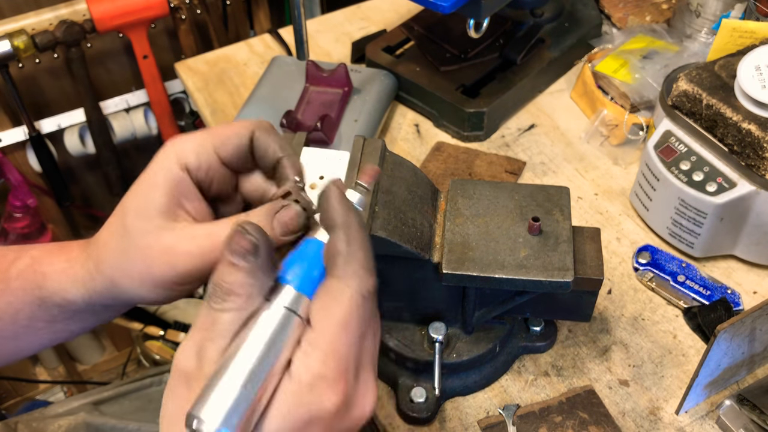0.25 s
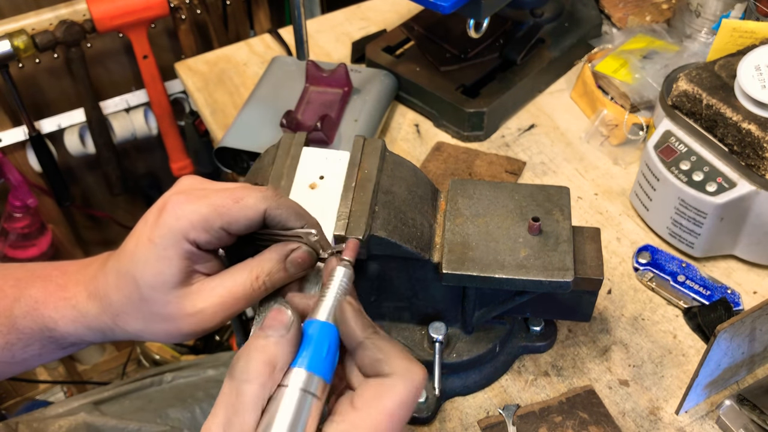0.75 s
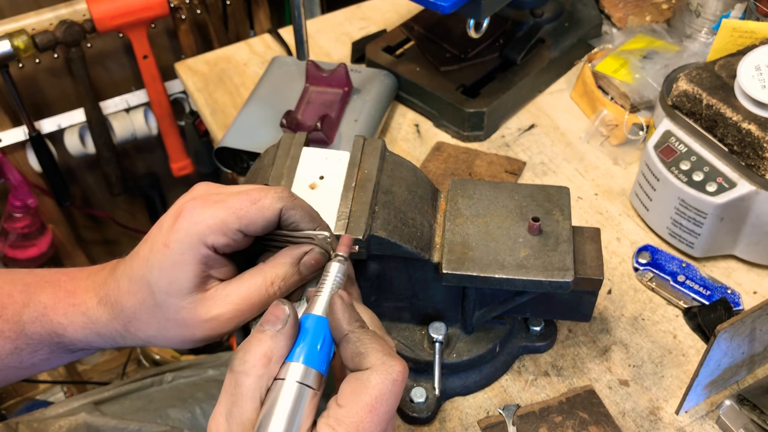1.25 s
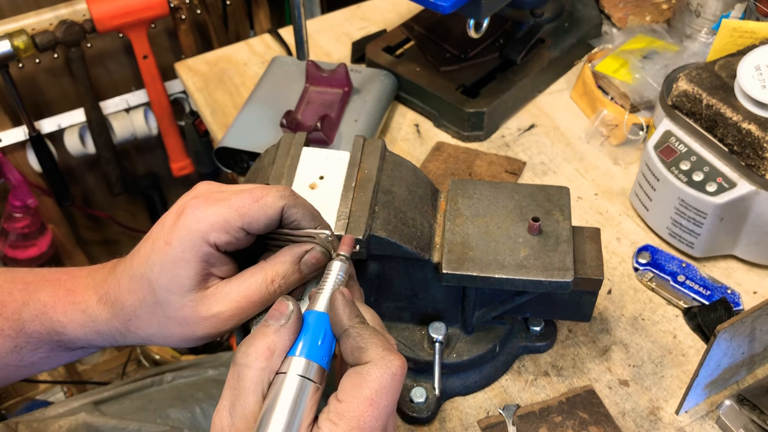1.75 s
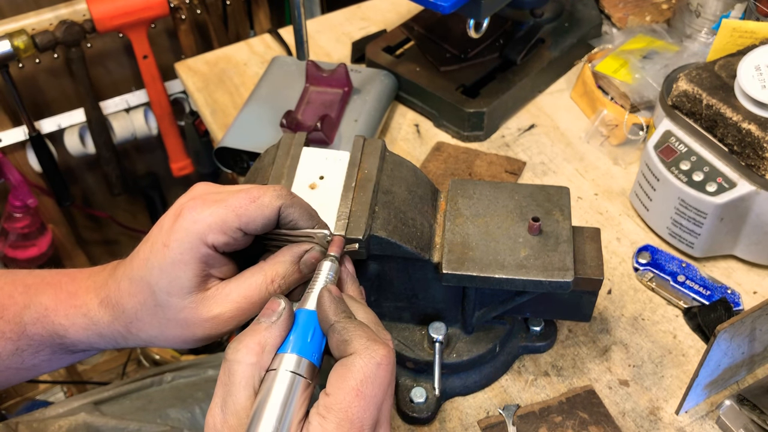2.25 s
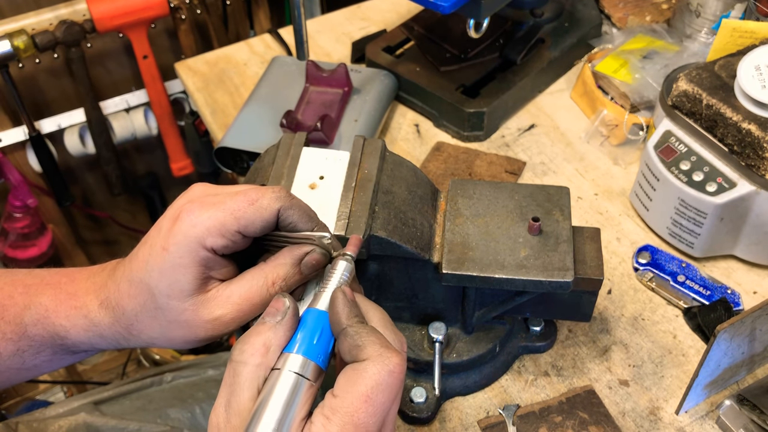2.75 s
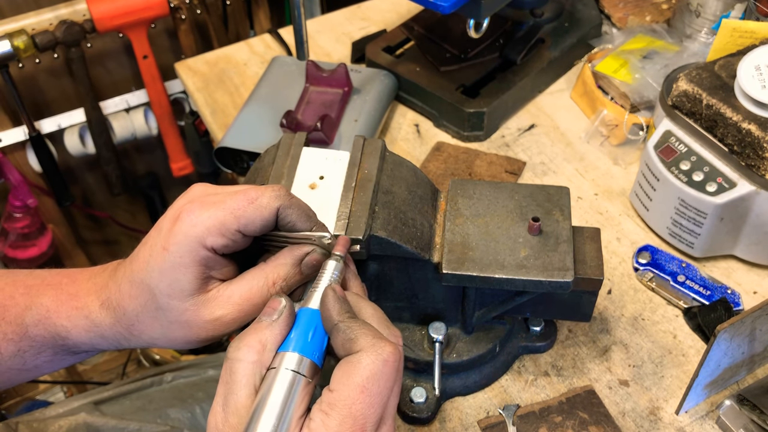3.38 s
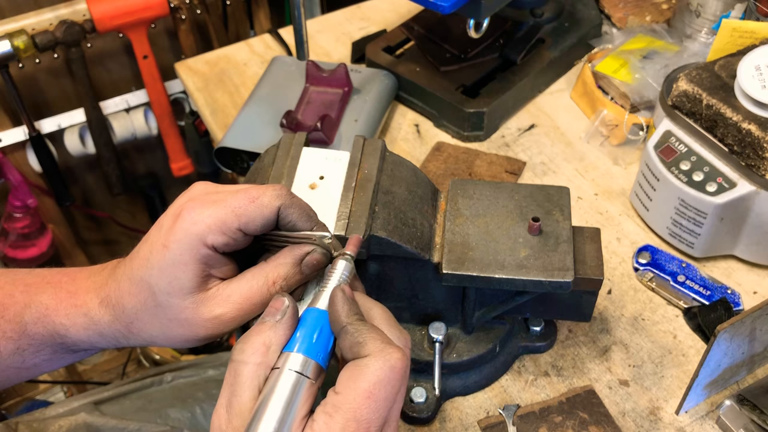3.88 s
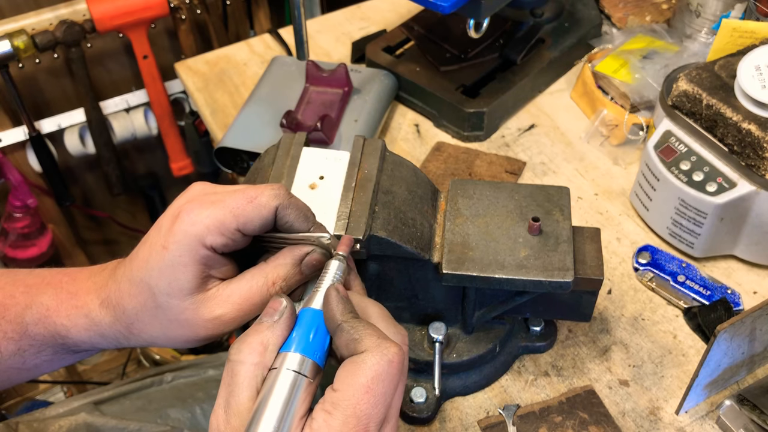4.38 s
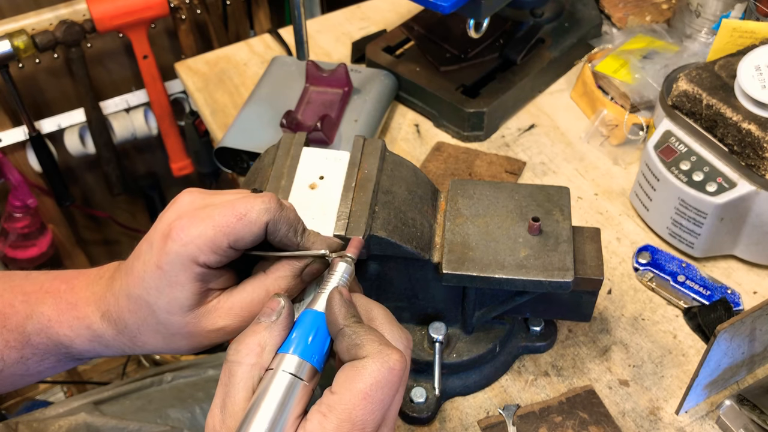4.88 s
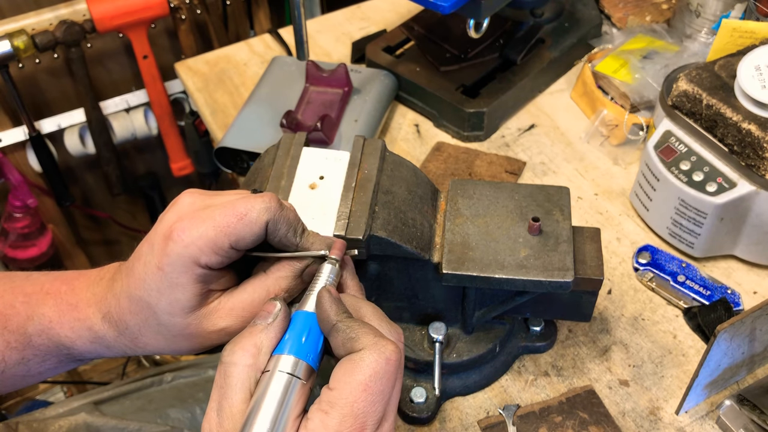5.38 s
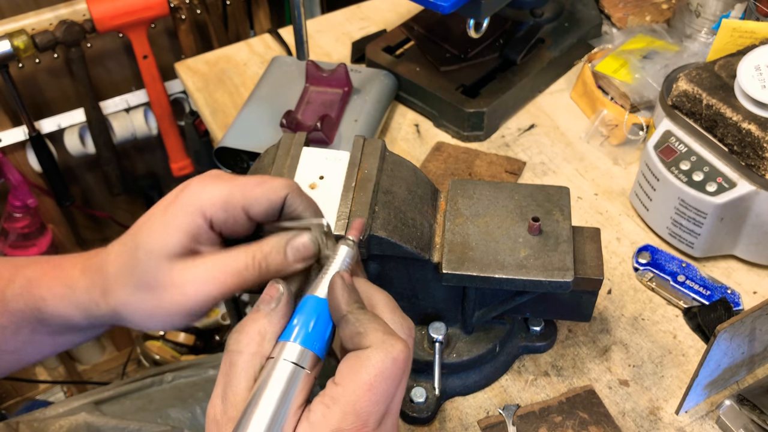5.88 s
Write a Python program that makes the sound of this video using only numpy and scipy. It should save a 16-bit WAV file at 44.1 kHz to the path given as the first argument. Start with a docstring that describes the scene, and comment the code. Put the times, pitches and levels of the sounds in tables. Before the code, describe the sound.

A handheld rotary tool runs close to the microphone at a workbench, with a buzzing whine, airy hiss and a thin high whistle. After about a second its abrasive bit touches a small metal piece and starts rasping in short, uneven passes. Firmer presses drag the pitch down and bring rapid rattling, brief chatter and tiny bright screeches. The motor recovers between passes and spins freely at the end.

```python
"""Rotary tool sanding metal

A handheld rotary tool sands a small metal piece held against a vise, heard close up.
Pressed on, the bit slows, knocks the work once a turn and rasps; now and then it bites or chatters.
Underneath, the shaft hums and buzzes, the motor moves air, the bearings hiss
and the speed controller whistles at a fixed pitch."""
import sys
import numpy as np
from scipy import signal
from scipy.fft import rfft, irfft, next_fast_len
from scipy.io import wavfile
from scipy.ndimage import uniform_filter1d, map_coordinates

SR = 44100
rng = np.random.default_rng(int(sys.argv[2]) if len(sys.argv) > 2 else 0)


def store_wav(level_fs):
    """Save 16-bit WAV to argv[1]."""
    pcm = np.round(np.clip(np.atleast_2d(level_fs), -1, 1) * 32767)
    wavfile.write(sys.argv[1], SR, pcm.T.astype(np.int16))


N = 270319
IDLE_HZ, FIRM_DRAG_HZ = 236.9, 30  # free-running turns a second; what a firm press takes off them
WIDE_WHIRL_DB, TOP_HZ = -47, 15760


# The bit rests lightly on the work. Each row: start and end in seconds.
TOUCH_SPANS = [(1.601, 2.63), (2.68, 3.76), (3.86, 4.59), (4.96, 5.67)]
# The hand leans in; drag is the speed the load would cost if held. Each row: start and end in seconds,
# first and last drag in Hz, relative levels of knock, rasp and scrape in dB.
HAND_PRESSES = [(1.2, 1.242, 9, 10, -50, -48, -39.5), (1.64, 1.757, 8.3, 9.6, -43.5, -38, -38.5),
                (1.751, 1.847, 12, 13.3, -47, -41, -38.5), (1.984, 2.109, 16.1, 25.3, -35.5, -39, -38),
                (2.164, 2.32, 21, 36, -35.5, -36, -40), (2.326, 2.467, 32.4, 59, -36.5, -35.5, -37.5),
                (2.465, 2.585, 60, 68, -39.5, -36.5, -39), (2.777, 2.914, 14.4, 17.2, -47.5, -39.5, -42.5),
                (3.002, 3.137, 21.2, 19, -37, -39, -45), (3.152, 3.233, 10.5, 10.3, -43, -40, -48),
                (3.246, 3.276, 12, 14.6, -35, -35.5, -39), (3.277, 3.335, 85, 100, -35, -36.5, -42),
                (3.343, 3.412, 45, 47, -35, -38.5, -40.5), (3.425, 3.481, 54, 57, -34, -38, -37),
                (3.485, 3.581, 51, 50, -36.5, -39.5, -39.5), (3.582, 3.642, 50, 48.5, -41, -41.5, -38.5),
                (3.937, 4.018, 11, 18.7, -47, -42, -43), (4.096, 4.152, 26, 26, -35, -47, -41.5),
                (4.151, 4.37, 26, 25.3, -35.5, -37.5, -41.5), (4.368, 4.458, 58, 44.4, -36, -38.5, -39.5),
                (4.466, 4.571, 40, 22.4, -39.5, -38, -40), (4.998, 5.097, 10, 13.1, -43, -37, -38),
                (5.147, 5.247, 5.45, 9.1, -45, -40.5, -39), (5.25, 5.379, 11.3, 25.6, -43, -39, -40),
                (5.385, 5.517, 111, 62, -37.5, -35, -36.5), (5.521, 5.591, 52, 58, -40.5, -40, -38.5),
                (5.597, 5.699, 83.5, 82, -40, -38, -38.5)]

def hand():
    """Touches and presses set the drag on the bit in Hz and the gains of knock, rasp and scrape."""
    touch_drag_hz, sag_db_per_s, release_s = 7.1, 3, .036
    touch = sum(gate(*span) for span in TOUCH_SPANS)
    drag = touch_drag_hz * touch
    gains = amp([[-47.5], [-42], [-43.5]]) * touch  # knock, rasp, scrape
    powers = np.array([[.37], [.14], [.12]])  # how each grows with effort
    for start, end, first_hz, last_hz, *levels_db in HAND_PRESSES:
        on = gate(start, end)
        push = curve([(start, first_hz), (end, last_hz)])
        drag += on * push
        held = on > 0
        effort = (push[held] + touch_drag_hz) / (push[held].mean() + touch_drag_hz)
        pressed = amp(levels_db)[:, None] * effort ** powers
        # the knock softens as the bit beds in and dies away as the hand eases off
        left_s = np.arange(held.sum(), 0, -1) / SR
        pressed[0] *= amp(sag_db_per_s * (left_s - left_s.mean())) * np.sqrt(np.tanh(left_s / release_s))
        gains[:, held] += on[held] * (pressed - gains[:, held])
    return drag, *gains


def rotor(drag, inertia_s=.117):
    """Turns a second: the rotor sags under drag and recovers with the same lag."""
    keep = np.exp(-1 / (inertia_s * SR))
    return IDLE_HZ - signal.lfilter([1 - keep], [1, -keep], drag)


# The bright rasp and the darker scrape. Each row: frequency in Hz, relative level in dB.
RASP_SPECTRUM = [(500, -46), (2000, -9), (5200, -7), (6600, 1), (8300, 6.5), (9400, 4), (10800, 2.5),
                 (12200, 1.5), (13800, 4.5), (14800, 9), (15600, 10)]
SCRAPE_SPECTRUM = [(200, -32), (700, -15.5), (1300, -7), (1900, -1.5), (2600, 0), (3300, -5.5), (3900, -10),
                   (4500, -1), (5300, -4), (6500, 0), (8500, -47), (12000, -45)]

def sanding(turns, rasp_gain, scrape_gain):
    """Grit tears the metal in tiny clumps, most at the high spot; the same grains return each turn."""
    clumps = unit(amp(2 * wobble(1100) + 1.2 * wobble(60)))
    tearing = clumps * per_turn(turns, depth_db=8, scatter_db=1.5) * patchy(3.5)
    rasp = coloured(tearing, RASP_SPECTRUM)
    rub = coloured(per_turn(turns, depth_db=7, scatter_db=7.5) * patchy(2.6), SCRAPE_SPECTRUM)
    scrape = unit(rub + amp(-1.5) * ragged_wave(turns, SCRAPE_SPECTRUM))
    return amp(4 + .4 * wobble(21.4)) * rasp_gain * rasp + amp(wobble(24.98)) * scrape_gain * scrape


def blows(turns, slowing, scuff_db):
    """The high spot of the bit strikes and scuffs once a turn, more unevenly towards a stall."""
    at = passes(turns)
    jitter, strength = rng.standard_normal((4096, 2))[:len(at)].T
    at = np.clip(np.round(at + 1e-5 * SR * jitter), 0, N - 1).astype(int)
    scatter_db = .5 + 6 * slowing[at]
    strikes = np.bincount(at, amp(scatter_db * strength), N)
    scuff = per_turn(turns, depth_db=15, scatter_db=4) * rng.standard_normal(N)
    return unit(strikes) + amp(scuff_db) * scuff


# The ring of the held piece. Each row: frequency in Hz, width in Hz, relative level in dB.
PIECE_MODES = [(1506.3, 106.6, 2), (1707.4, 130, 0), (1983, 188.5, 0.5), (2289.5, 200, -1.5),
               (2610, 350, -9)]
# How well the piece radiates. Each row: frequency in Hz, relative gain in dB.
PIECE_RADIATION = [(300, -36), (650, -15), (900, 2), (1100, -5), (1280, -1.5), (2700, 3), (3400, -3),
                   (6000, -7)]

def knocking(turns, knock_gain, slowing):
    """The blows ring the held piece, whose modes die away within a turn or two."""
    force = blows(turns, slowing, scuff_db=-17)
    ring = sum(amp(db + 2.3 * wobble(45)) * resonate(force, [(hz, width, 0)])
               for hz, width, db in PIECE_MODES)
    return amp(-2 + .13 * wobble(30)) * knock_gain * coloured(ring, PIECE_RADIATION)


# Brief rattles. Each row: centre in seconds, level in dB, half length in seconds, pitch in Hz.
PIECE_RATTLES = [(1.133, -45, 0.05, 4500), (1.272, -44, 0.03, 4730), (1.486, -50, 0.14, 4700),
                 (2.001, -42, 0.0099, 1630), (2.09, -43, 0.011, 1500), (2.235, -43, .045, 2150),
                 (2.34, -38, .014, 1530), (2.412, -39, 0.014, 1580), (2.408, -44, 0.011, 2350),
                 (2.45, -39.5, 0.033, 4600), (2.702, -44, 0.11, 4550), (3.305, -41, 0.021, 1399),
                 (3.468, -43, 0.018, 3350), (3.52, -44, 0.048, 2406), (3.633, -35.5, 0.012, 4874),
                 (4.13, -48, .025, 2432), (4.436, -41, 0.015, 1455), (5.396, -37.5, .012, 1379),
                 (5.501, -33.5, 0.012, 1556), (5.547, -45, 0.0081, 1501), (5.573, -46, .009, 2381),
                 (5.634, -39.5, .055, 4320), (5.65, -43, 0.016, 1400)]

def rattles(turns, slowing):
    """The piece rattles against the bit: looser, rougher blows bring out one resonance."""
    contacts = blows(turns + .15, slowing, scuff_db=-9) + slowing * rng.standard_normal(N)
    out = np.zeros(N)
    for centre, db, half, hz in PIECE_RATTLES:
        ring = signal.lfilter(*signal.iirpeak(hz, Q=7, fs=SR), contacts)
        out += swell(centre, db, half) * unit(ring)
    return out


# The grit digs in at an edge. Each row: centre in seconds, level in dB, half length in seconds.
EDGE_BITES = [(1.152, -34, 0.01), (1.221, -29.5, 0.019), (2.58, -33, 0.019), (2.83, -34, 0.02),
              (3.643, -30, 0.025), (3.714, -34.5, 0.019), (3.888, -36, 0.016), (4.574, -39, 0.013),
              (4.986, -35.5, 0.038), (5.684, -31, 0.028)]
# The high modes of the piece. Each row: frequency in Hz, width in Hz, relative gain in dB.
SCREECH_MODES = [(10400, 500, -0.5), (12050, 640, 0), (15500, 1100, 7.5)]
# The edge sticks. Each row: centre in seconds, level in dB, half length in seconds, pitch in Hz.
EDGE_SQUEAKS = [(2.86, -41, .033, 10930), (2.835, -45, .025, 11820), (3.9, -47, .025, 10900)]

def bites(turns, bite_gain):
    """Short bright screeches where an edge catches the grit, some with a narrow squeak."""
    t = np.arange(N) / SR
    friction = per_turn(turns, depth_db=9, scatter_db=2) * rng.standard_normal(N)
    slip = unit(wobble(400))
    squeaks = sum(swell(centre, db, half) * np.sin(2 * np.pi * hz * t)
                  for centre, db, half, hz in EDGE_SQUEAKS)
    return bite_gain * resonate(friction, SCREECH_MODES) + np.sqrt(2) * slip * squeaks


# The bit bounces on the work. Each row: start and end in seconds, relative level in dB.
CHATTER_BURSTS = [(3.287, 3.339, -28.5), (3.434, 3.46, -33.5), (5.383, 5.411, -29)]
# The colour of a crack. Each row: frequency in Hz, relative gain in dB.
CRACK_SPECTRUM = [(300, -32), (900, -13), (1400, 5), (2400, 0.5), (3600, 2.5), (5200, 0), (7000, 6.5),
                  (9500, -2.5), (15000, -5)]

def chatter(turns, t60=.02):
    """Hard dry cracks of uneven strength, one a turn, damped at once by the fingers."""
    t = np.arange(1024) / SR
    at = passes(turns)
    cracks = np.zeros(N)
    for start, end, db in CHATTER_BURSTS:
        for i in at[(at > start * SR) & (at < end * SR)]:
            decay = amp(db + 2 * rng.uniform(-1, 1) - 60 * t / t60)
            cracks[int(i):][:len(t)] += decay * rng.standard_normal(len(t))
    return filtered(cracks, lambda hz: amp(along(CRACK_SPECTRUM, hz) + 3.5))


# Side load bends the shaft twice a turn and it resonates.
# Each row: frequency in Hz, relative level under a firm press in dB.
FLEX_RESONANCE = [(320, -69), (355, -63.5), (385, -71), (412, -63), (440, -57), (470, -76)]
# The ride of the shaft's third order. Each row: time in seconds, relative level in dB.
THIRD_ORDER_RIDE = [(0.0, -52), (1.07, -58.5), (1.28, -51), (1.31, -57), (1.8, -56.5), (2.06, -53),
                    (2.12, -64), (2.18, -54.5), (2.34, -52), (2.37, -66), (2.42, -58), (2.62, -59.5),
                    (2.78, -52.5), (2.82, -61), (3.06, -59), (3.13, -64), (3.25, -55.5), (3.33, -61),
                    (3.7, -60), (3.84, -48.5), (4.01, -56.5), (4.06, -50), (4.11, -73), (4.2, -54.5),
                    (4.58, -57), (4.7, -48.5), (4.98, -47), (5.04, -54), (5.22, -53), (5.27, -62),
                    (5.43, -58), (5.7, -61.5), (5.91, -48), (6.13, -47.5)]
# Overtones of the free-running bit. Each row: multiple of the turn rate, level in dB.
IDLE_ORDERS = [(4, -56.5), (6, -56), (7, -54.5), (8, -61), (10, -58), (13, -60)]

def shaft_hum(turns, slowing, load):
    """The shaft's clean low orders, which waver under load and judder towards a stall."""
    def order(k):
        return np.sqrt(2) * np.sin(2 * np.pi * (k * turns + rng.random()))

    def judder():
        return amp(load * (2.5 * wobble(35) - .5) + 9 * slowing * wobble(90) - 3 * slowing)

    unbalance = amp(-59.8 - 39 * slowing + .77 * wobble(4.47)) * order(1)
    flex_gain = amp(-75.5) + load * amp(along(FLEX_RESONANCE, 2 * IDLE_HZ * (1 - slowing)))
    flex = judder() * flex_gain * order(2)
    third = judder() * amp(curve(THIRD_ORDER_RIDE) + 1.5) * order(3)
    running_free = np.clip(1 - slowing / .035, 0, 1)
    overtones = sum(amp(db + 2.2 * wobble(2.3)) * order(k) for k, db in IDLE_ORDERS)
    return unbalance + flex + third + running_free * overtones


# The shaft whirls more as the grip shifts. Each row: time in seconds, relative unloaded whirl in dB.
WHIRL_RIDE = [(0, -63), (1.3, -52), (2.2, -53.5), (3.3, -46), (4.7, -45.5), (6.13, -46)]
# The colour of the buzz. Each row: frequency in Hz, relative level in dB.
BUZZ_SPECTRUM = [(900, -34), (1150, 0), (1400, 2), (1650, 2), (1880, 1.5), (2300, 1), (2560, 5.5),
                 (2780, 8.5), (3000, 0), (3280, -1), (3500, -5), (4050, 1.5), (4400, -2), (4650, 8),
                 (4900, -4), (6300, -8), (8000, 3), (10400, -9), (12000, -36)]

def shaft_buzz(turns, whirl_db):
    """The whirling shaft rattles in its play: a buzz that falls away fast as the whirl narrows."""
    level_db = whirl_db + 7 - 1.7 * np.maximum(WIDE_WHIRL_DB - whirl_db, 0)
    pulses = per_turn(turns, depth_db=10, scatter_db=-2) * rng.standard_normal(N)
    high_orders = ragged_wave(turns + .003 * wobble(70), BUZZ_SPECTRUM)
    buzz = unit(high_orders + amp(-13) * coloured(pulses, BUZZ_SPECTRUM))
    return amp(level_db + .55 * wobble(25)) * buzz


# The ride of the motor's air. Each row: time in seconds, level at full speed in dB.
AIR_RIDE = [(0, -37.5), (.5, -39), (.9, -39), (2, -39.5), (4.6, -40), (6.13, -40)]
# The colour of the air. Each row: frequency in Hz, relative level in dB.
AIR_SPECTRUM = [(25, -35), (60, -16), (200, -16), (400, -16), (750, -7), (1080, -5.5), (1240, 3),
                (1550, -0.5), (2500, -0.5), (3350, -4.5), (4000, 0), (4600, 0), (5150, -8.5), (6300, -5),
                (9000, -7), (15500, -8)]
# The ring of the casing. Each row: frequency in Hz, width in Hz, relative gain in dB.
CASING_MODES = [(1233, 46, -1.5), (1344, 40, -3), (1645, 29, -4.5), (1903, 26, -12.5)]

def motor_air(slowing):
    """The motor's air noise rings its casing and sinks as the rotor slows."""
    rush = coloured(patchy(1.5), AIR_SPECTRUM)
    casing = resonate(amp(1.8 * wobble(35)) * rng.standard_normal(N), CASING_MODES)
    return amp(curve(AIR_RIDE) - 10 * slowing) * (rush + amp(-10) * casing)


# The ride of the bearing hiss. Each row: time in seconds, relative level in dB.
HISS_RIDE = [(0.0, -39), (.45, -41), (.7, -37), (.77, -43), (1, -39.5), (1.06, -46), (1.09, -39.5),
             (1.25, -44), (1.43, -43.5), (1.9, -41.5), (2.36, -38), (2.51, -40), (2.62, -41), (2.7, -36),
             (2.85, -44.5), (3.05, -41.5), (3.24, -44.5), (3.31, -40.5), (3.73, -42.5), (3.76, -37),
             (3.85, -39), (3.93, -42), (4.55, -40), (4.6, -35), (4.7, -38), (4.98, -38.5), (5.1, -41.5),
             (5.38, -44), (5.39, -37.5), (5.55, -40), (5.68, -47), (5.73, -39.5), (5.8, -36), (6.13, -38)]
# The colour of the hiss. Each row: frequency in Hz, relative level in dB.
HISS_SPECTRUM = [(3000, -32.5), (5300, -13), (6000, -10), (6500, -6), (6800, -1.5), (7100, 2), (7350, -4.5),
                 (7750, 0), (8250, 1), (8750, -5), (9100, -8.5), (10400, -9), (15500, -11)]

def bearings(turns, slowing, load, whirl_db):
    """A fluttering hiss, with a sizzle that repeats each turn when the shaft whirls widely."""
    flutter = unit(amp(2.2 * wobble(170) + 1.1 * wobble(35)))
    flutter *= per_turn(turns, depth_db=2.5, scatter_db=2.5)
    hiss = coloured(flutter * patchy(1.2), HISS_SPECTRUM)
    sizzle = amp(-4 + 1.2 * (whirl_db - WIDE_WHIRL_DB)) * ragged_wave(turns, HISS_SPECTRUM)
    return amp(curve(HISS_RIDE) + 2.04 - 19.5 * slowing + 2.3 * load) * (hiss + sizzle)


# The whistle fades and returns as the hands move. Each row: time in seconds, level in dB.
WHISTLE_RIDE = [(0, -40), (.2, -44), (.48, -45), (.58, -42.5), (.74, -38), (1, -44.5), (1.25, -41.5),
                (1.45, -42.5), (1.65, -41), (2, -45), (2.55, -46), (2.72, -41), (2.95, -47.5), (3.38, -50),
                (3.55, -46.5), (4.1, -45.5), (4.25, -51), (4.6, -47), (5, -45), (5.3, -58), (5.65, -55),
                (5.85, -51), (6.13, -50)]

def controller(switching_hz=6982.5):
    """The speed controller's switching tone and its octave, both wavering slightly."""
    phase = 2 * np.pi * switching_hz * np.arange(N) / SR + .31 * wobble(7)
    tone = amp(curve(WHISTLE_RIDE) + .86 * wobble(15)) * np.sin(phase)
    octave = amp(-60.5 + 2.3 * wobble(8)) * np.sin(2 * phase)
    return np.sqrt(2) * (tone + octave)


def bench(x, wet_db, t60):
    """Bench and walls add a short, dense answer."""
    t = np.arange(SR // 3) / SR
    tail = rng.standard_normal(len(t)) * amp(-60 * t / t60) * (t > .002)
    return x + amp(wet_db) * signal.fftconvolve(x, tail / np.linalg.norm(tail))[:N]


def ragged_wave(turns, spectrum, drift=.22, size=1024):
    """One wave a turn, slowly changing: wavering high orders sweep through a fixed spectrum."""
    hz = IDLE_HZ * np.arange(size // 2 + 1)
    phases = np.exp(2j * np.pi * rng.random((3, len(hz))))
    waves = irfft((hz > 1000) * (hz < TOP_HZ) * phases)
    steady, *drifting = [np.interp(turns % 1, np.arange(size) / size, wave) for wave in waves]
    return coloured(steady + drift * sum(wobble(28) * wave for wave in drifting), spectrum)


def per_turn(turns, depth_db, scatter_db):
    """A gain that peaks once a turn, each turn at a new strength."""
    strength = rng.uniform(-1, 1, 4096)[np.round(turns).astype(int)]
    peak = np.cos(np.pi * turns) ** 8
    return unit(amp(peak * (depth_db + scatter_db * strength)))


def passes(turns):
    """The samples at which the high spot of the bit comes round."""
    return np.interp(np.arange(1, int(turns[-1])), turns, np.arange(N))


def patchy(depth_db):
    """Noise whose colour shifts in small random patches."""
    bins = signal.stft(rng.standard_normal(N), nperseg=512)[2]
    patches = uniform_filter1d(rng.standard_normal(bins.shape), size=6, axis=0)
    patches = uniform_filter1d(patches, size=12, axis=1)
    return unit(signal.istft(bins * amp(depth_db * unit(patches)), nperseg=512)[1][:N])


def resonate(x, modes):
    """x rung through (Hz, width, dB) resonances of alternating sign, at rms 1."""
    def response(f):
        return sum((-1) ** k * amp(db) * 1j * f * width / (hz * hz - f * f + 1j * f * width)
                   for k, (hz, width, db) in enumerate(modes))
    return unit(filtered(x, response))


def coloured(x, spectrum):
    """x shaped by a spectrum, at rms 1."""
    return unit(filtered(x, lambda hz: amp(along(spectrum, hz))))


def filtered(x, response):
    """x through a complex frequency response."""
    size = next_fast_len(N + 8192)
    return irfft(rfft(x, size) * response(np.fft.rfftfreq(size, 1 / SR)), size)[:N]


def gate(start, end, ramp_s=.0088):
    """1 between two times, with short ramps."""
    t = np.arange(N) / SR
    return np.clip((t - start) / ramp_s + .5, 0, 1) * np.clip((end - t) / ramp_s + .5, 0, 1)


def swell(centre, db, half):
    """A brief bell-shaped gain."""
    return amp(db) * np.exp(-np.minimum(((np.arange(N) / SR - centre) / half) ** 2, 50))


def wobble(rate):
    """A smooth random curve, rate knots a second."""
    return map_coordinates(rng.standard_normal(8192), [np.arange(N) * rate / SR], mode="mirror")


def curve(rows):
    """(seconds, value) rows as one value per sample."""
    return np.interp(np.arange(N) / SR, *np.transpose(rows))


def along(points, hz):
    """(Hz, value) points read on a log axis."""
    freqs, values = np.transpose(points)
    return np.interp(np.log(hz + 1), np.log(freqs + 1), values)


def amp(db):
    """Decibels to gain."""
    return 10 ** (np.asarray(db) / 20)


def unit(x):
    """x at rms 1."""
    return x / np.sqrt(np.mean(x ** 2) + 1e-20)


def scene():
    """The hand loads the bit, the load slows the shaft, and the shaft sets the pace of the sanding."""
    drag, knock_gain, rasp_gain, scrape_gain = hand()
    speed = rotor(drag)
    turns = np.cumsum(speed * (1 + .0006 * wobble(40))) / SR
    slowing = 1 - speed / IDLE_HZ  # 0 running free, 1 at a standstill
    load = np.tanh(2 * drag / FIRM_DRAG_HZ)
    whirl_db = curve(WHIRL_RIDE) - 14 * slowing - 6 * load
    bite_gain = sum(swell(*bite) for bite in EDGE_BITES)
    rasp_gain = np.hypot(rasp_gain, amp(-5) * bite_gain)  # a bite also rasps
    work = knocking(turns, knock_gain, slowing) + sanding(turns, rasp_gain, scrape_gain)
    work += bites(turns, bite_gain) + chatter(turns) + rattles(turns, slowing)
    tool = shaft_hum(turns, slowing, load) + shaft_buzz(turns, whirl_db)
    tool += motor_air(slowing) + bearings(turns, slowing, load, whirl_db) + controller()
    mono = tool + bench(work, wet_db=-20, t60=.12)
    return np.array([mono, mono])


def record(dry):
    """A brick-wall low-pass takes off the very top."""
    return np.array([filtered(channel, lambda hz: hz < TOP_HZ) for channel in dry])


dry = scene()
out = record(dry)
store_wav(out)
```